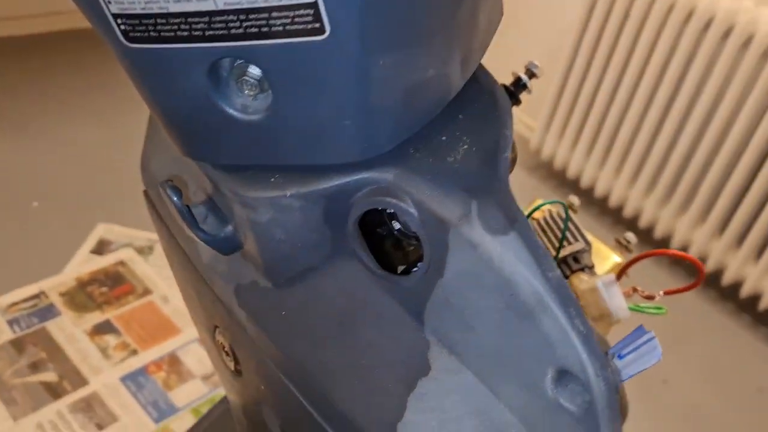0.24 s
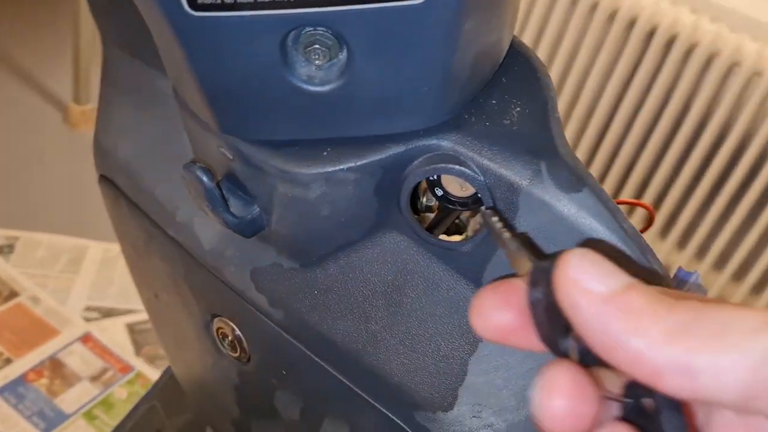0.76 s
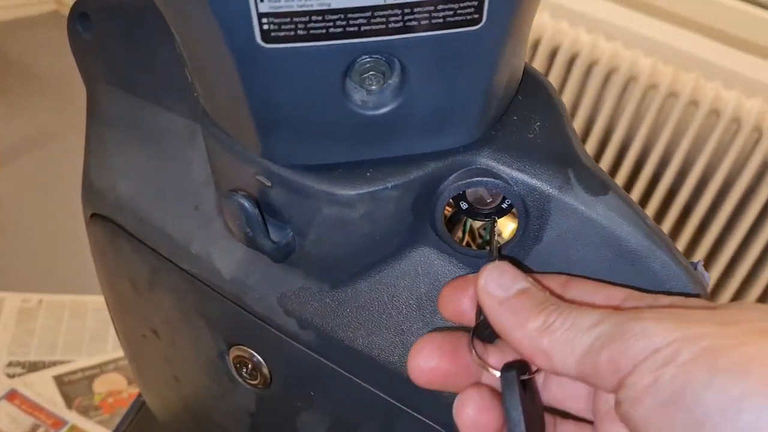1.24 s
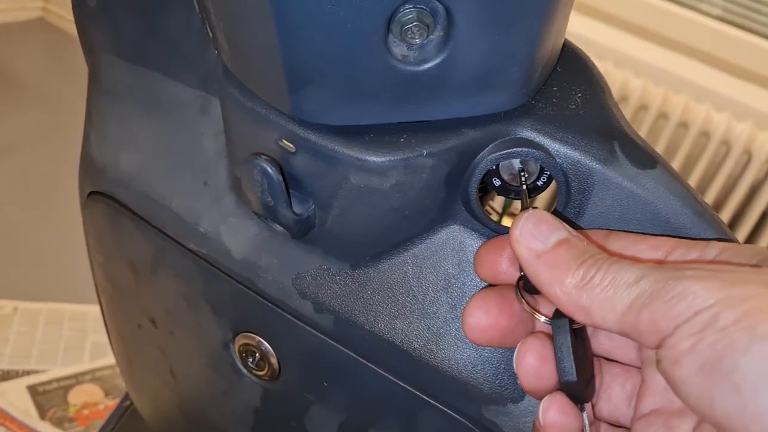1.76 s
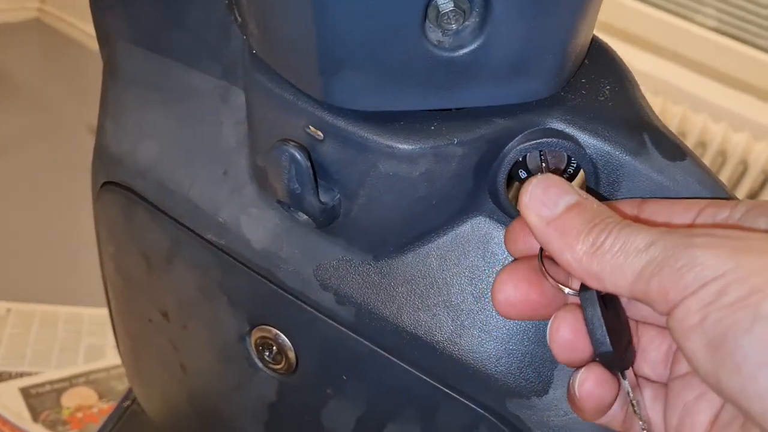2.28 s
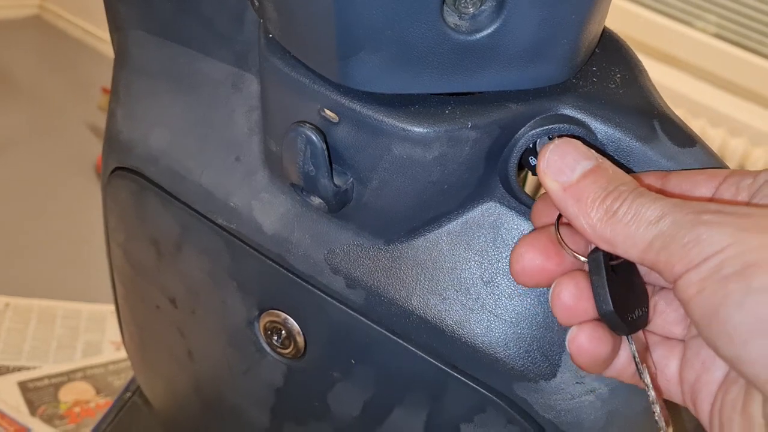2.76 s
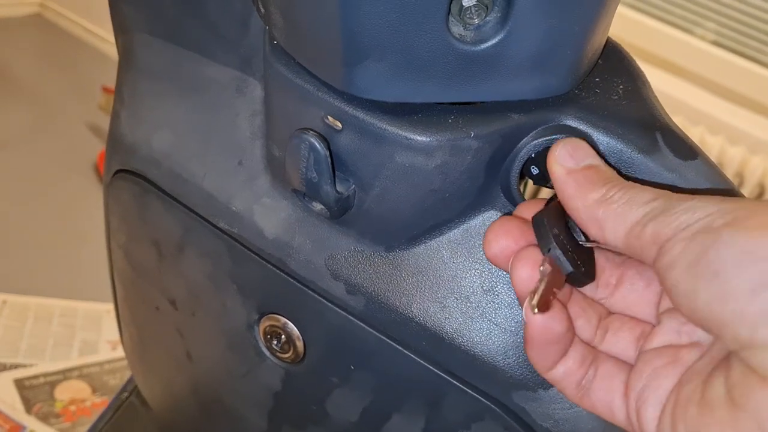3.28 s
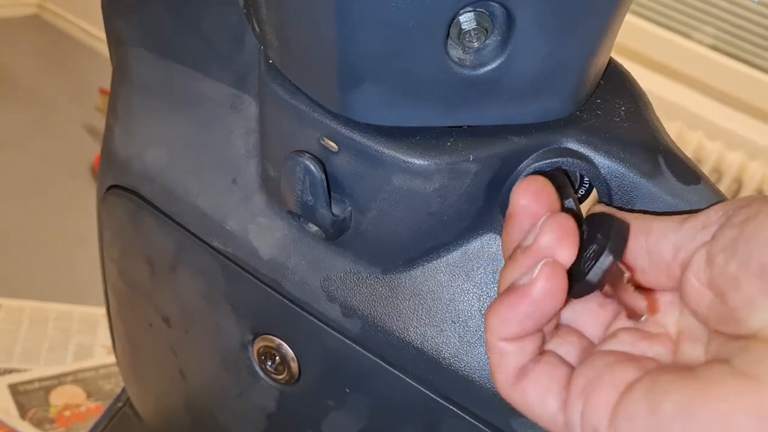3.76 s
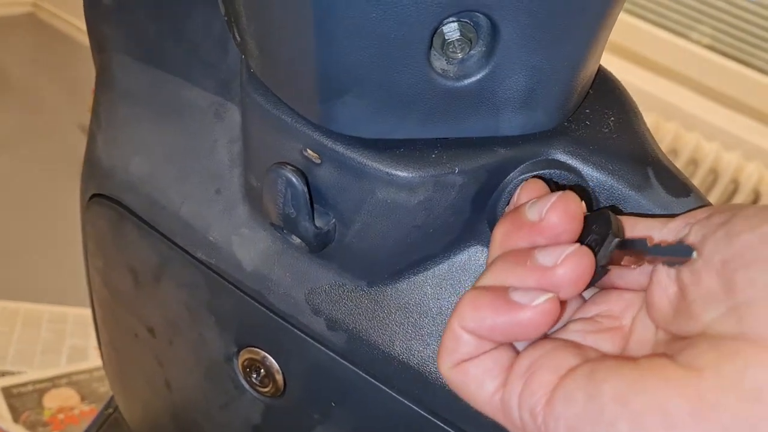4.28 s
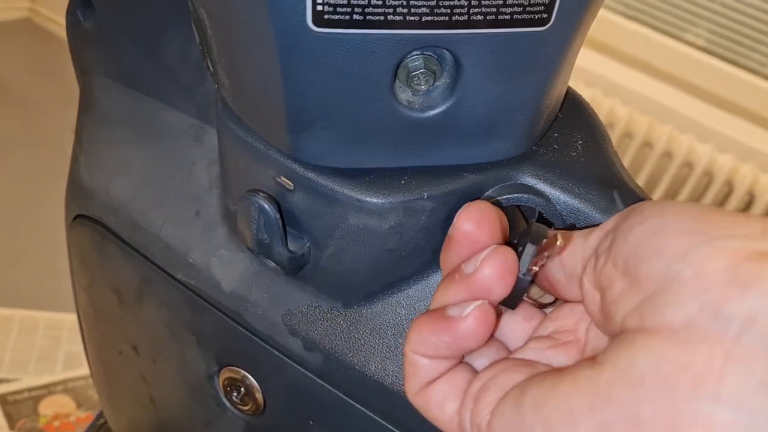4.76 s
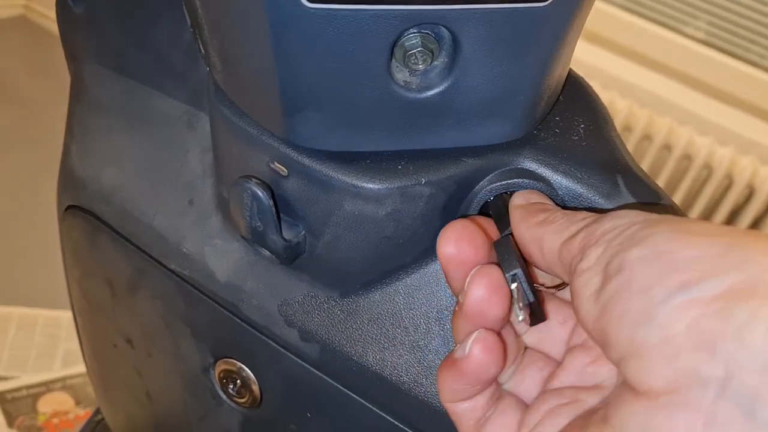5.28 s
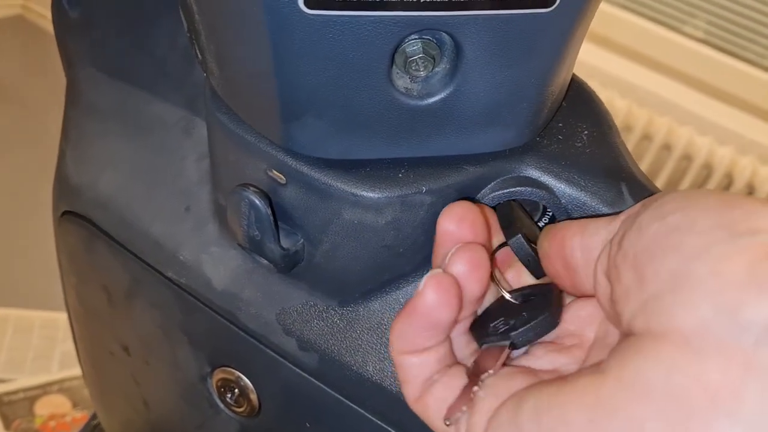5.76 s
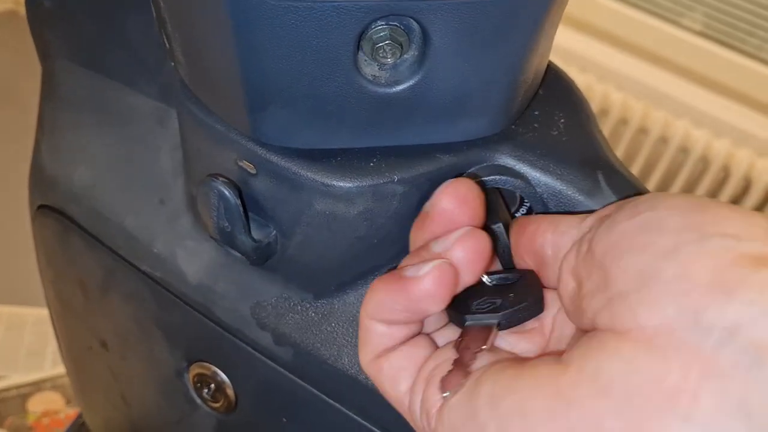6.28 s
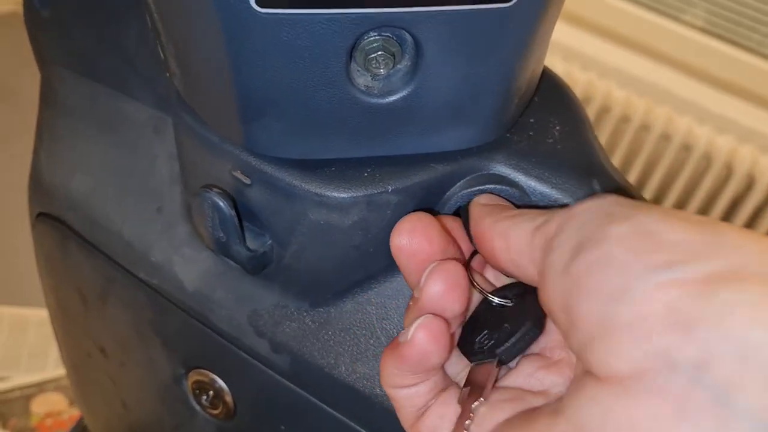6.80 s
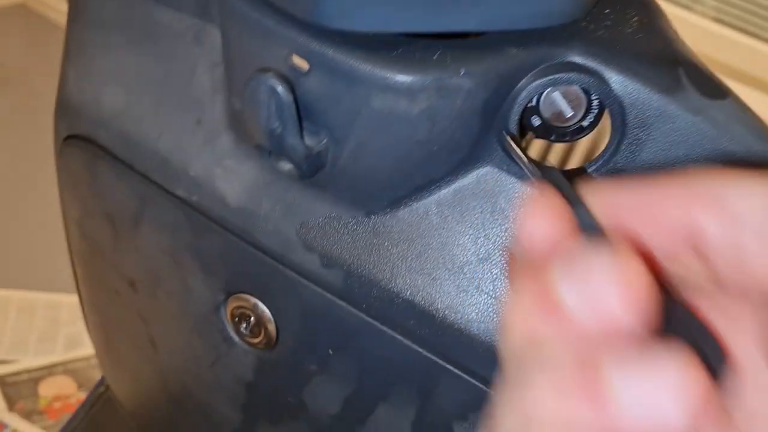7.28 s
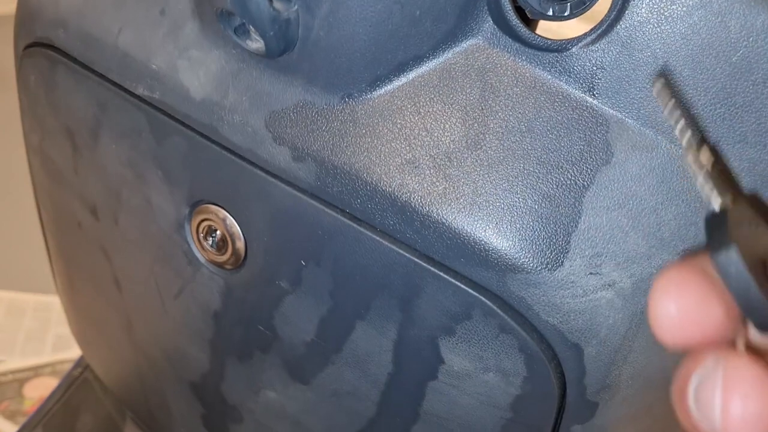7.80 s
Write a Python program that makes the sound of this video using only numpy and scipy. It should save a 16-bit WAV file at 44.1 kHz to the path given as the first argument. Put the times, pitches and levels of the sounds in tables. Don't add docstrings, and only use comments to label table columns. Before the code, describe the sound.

Close handheld stereo of a key worked in a scooter's ignition. Soft cloth and finger rubbing follows a single dull floor tap; light clicks precede a tight cluster of metal pin ticks as the blade slides home, jolting the hollow plastic cowl. Sparse turning clicks and low, muffled knocks follow over quiet room air. A dense burst of snaps, thin metallic singing and plastic clacks marks removal, then rustling settles in the small, reflective room.

```python
import sys
import numpy as np
from scipy import signal
from scipy.io import wavfile
from scipy.ndimage import uniform_filter1d

SR = 44100
rng = np.random.default_rng(int(sys.argv[2]) if len(sys.argv) > 2 else 0)


def invert_db(x):
    u = np.asarray(x, float) / 20
    return 10 ** u


def transcribe(signal):
    frames = np.atleast_2d(signal).T
    limited = np.clip(frames, -1, 1)
    pcm = np.round(limited * 32767).astype(np.int16)
    wavfile.write(sys.argv[1], SR, pcm)


N = 354608

# pitch in Hz, left-right likeness (below 0 counts as 0).
LEFT_RIGHT_LIKENESS = [(50, 0.64), (150, 0.9), (300, 0.85), (600, 0.54), (1500, -0.83), (4000, -0.047),
                       (15000, -1.8)]


def rms_one(x):
    return x / np.sqrt(np.mean(x ** 2) + 1e-20)


def at_hz(points, hz):
    table_hz, value = np.transpose(points)
    return np.interp(np.log(hz), np.log(table_hz), value)


def band(x, low_hz, high_hz):
    sos = signal.butter(2, [low_hz, min(high_hz, .45 * SR)], "band", fs=SR, output="sos")
    return signal.sosfilt(sos, x)


def ring(x, hz, t60):
    r, w = invert_db(-60 / (t60 * SR)), 2 * np.pi * hz / SR
    return signal.lfilter([0, np.sin(w)], [1, -2 * r * np.cos(w), r * r], x + 1e-18)


def drift(rate):
    r = np.exp(-80 * np.pi * rate / SR)
    slow = signal.lfilter([1], [1, -2 * r, r * r], rng.standard_normal(N // 40 + 2002))[2000:]
    return np.interp(np.arange(N) / 40, np.arange(len(slow)), rms_one(slow))


def swells(s, peak_db, rise, fade, hold=0):
    t = np.arange(0, N + 40, 40)[:, None] / SR
    under = np.maximum(np.maximum((s - t) / rise, (t - s - hold) / fade), 0)
    gain = np.sqrt(np.sum(invert_db(peak_db - 10 * under) ** 2, axis=1))
    return np.interp(np.arange(N) / SR, t[:, 0], gain)


def tick(size):
    return 1.0 * (np.arange(size) == 0)


def push(length, size):
    t = np.arange(size) / SR / max(length, 2e-4)
    return np.tile(t * np.exp(-6 * t), (2, 1))


def contact(length, size, shared):
    t = np.arange(size) / SR / max(length, 2e-4)
    both, left, right = rng.standard_normal((3, size))
    shared = np.clip(shared, 0, 1)
    return t * np.exp(-4 * t) * (np.sqrt(shared) * both + np.sqrt(1 - shared) * np.array([left, right]))


def metal(force, hz, part_db):
    part = rms_one(band(force, hz / 1.15, hz * 1.37)) + invert_db(4.0) * rms_one(ring(force, hz, 14 / hz))
    crack = rms_one(band(force, hz / 2.5, hz * 2.23)) + invert_db(-2.5) * rms_one(band(force, 1800, 14000))
    return crack + invert_db(part_db + 4.0) * part


def struck_body(force, modes, centre_hz, focus_db):
    octaves_off = np.log2(np.array(modes)[:, 0] / centre_hz)
    strength_db = 3.5 * rng.standard_normal(len(modes)) - focus_db * octaves_off ** 2
    return sum(invert_db(db + more_db) * ring(force, hz, t60)
               for more_db, (hz, db, t60) in zip(strength_db, modes))


def add(out, near, smooth, s, peak_db, pan_db):
    at = round(s * SR)
    near = near[:, :N - at] * invert_db(peak_db) / np.abs(near.mean(axis=0)).max()
    end = at + near.shape[1]
    out[:2, at:end] += near * invert_db([[pan_db / 2], [-pan_db / 2]])
    out[2, at:end] += rms_one(smooth[:N - at]) * np.sqrt(np.mean(near ** 2))


def clicks():
    # start in seconds, peak in dB,
    # loudest part in Hz, that part over the broad crack in dB, left over right in dB.
    pins_in = [(0.2783, -46, 3600, 6, -3), (1.253, -45.5, 7840, 11, -7), (1.406, -34.5, 3950, -7, 4),
               (1.712, -58.5, 5940, -20, -2.5), (2.2507, -35, 12200, 4, -13), (2.68, -55.5, 6470, 5, -13),
               (2.7883, -29.5, 13900, -6, 1.5), (2.8818, -31, 11800, -5, 38), (3.042, -30.5, 13700, -2, 6),
               (3.049, -31, 8100, -12, 0), (3.071, -34, 12500, -3.5, 3), (3.079, -36.5, 3400, 0, -4),
               (3.1478, -26.5, 15000, 15, 2), (3.1612, -31.5, 11500, 1, 16.5),
               (3.1785, -34.5, 12500, 0, 14), (3.3056, -37.5, 5670, -13, -2), (3.349, -26.5, 3580, -10, -3),
               (3.4785, -27, 6870, 1.5, -3)]
    detents = [(3.7868, -47, 6500, -2, 0), (5.2237, -35.5, 5400, -3.5, 17), (5.4242, -20, 4940, 8, 10),
               (5.69, -57, 6400, 2, -6), (5.71, -37, 11600, 8, 40), (5.7178, -41, 2750, 14, 2),
               (6.107, -35, 4300, -4, -4), (6.401, -62, 7000, 5, 1.5), (6.44, -58, 5100, 13, -1),
               (6.5816, -36, 6840, 4, 3), (6.95, -49, 7840, 13, -5)]
    pins_out = [
        (7.1522, -34.5, 11450, 1, 5.5),
        (7.1812, -25.5, 12300, 5, 5.5),
        (7.227, -18, 12770, 5.5, 9),
        (7.2363, -25, 9960, 1.5, 2),
        (7.241, -28.5, 11900, -6, 2),
        (7.2625, -25, 3190, 7, 2),
    ]
    # (Hz, t60 in seconds).
    loose_key = [
        (1.405, -34.5, [(7700, 0.022), (8300, 0.019), (8700, 0.023)]),
        (2.786, -33, [(12400, .05), (12950, 0.073), (13150, 0.081), (13500, 0.044)]),
        (7.225, -31, [(3400, 0.008), (4050, 0.008), (5800, 0.012)]),
    ]
    out = np.zeros((3, N))
    for table, contact_s in [(pins_in, .0048), (detents, .0015), (pins_out, .0048)]:
        for s, peak_db, hz, part_db, pan_db in table:
            near = metal(contact(contact_s, size=2000, shared=0.21), hz, part_db)
            to_room = metal(tick(size=2000), hz, part_db - 11.0)
            add(out, near, to_room, s - .0012, peak_db - 0.5, 0.5 * pan_db + .8)
    for s, peak_db, modes in loose_key:
        near = sum(ring(contact(0.0003, size=8000, shared=0.26), hz, t60) for hz, t60 in modes)
        add(out, near, near[0], s, peak_db, 2.5)
    return out * invert_db([[0], [0], [-3.0]])


def knocks():
    # start in seconds, panel peak in dB, hollow over panel in dB,
    # panel centre in Hz, hollow centre in Hz.
    jolts = [(0.282, -42, 0.5, 900, 298), (1.41, -39, -5.5, 1630, 339), (2.251, -44, -17, 820, 386),
             (2.793, -32.5, -4, 2140, 335), (2.881, -36, -6.5, 1690, 238), (3.047, -26.5, -3.5, 2220, 311),
             (3.072, -33, -27, 1300, 320), (3.082, -32.5, -22, 1290, 360), (3.176, -29, -3.5, 1070, 231),
             (3.305, -38.5, -6, 870, 234), (3.3488, -26, -9, 1410, 285), (3.48, -26.5, -5, 1520, 243),
             (3.787, -42.5, 9.5, 1080, 296), (5.4252, -27, 2.5, 900, 248), (5.689, -42, -3, 1340, 235),
             (5.717, -33.5, -1.5, 1800, 251), (6.106, -28, 2.5, 1050, 275.6), (6.581, -35.5, 2, 1140, 239),
             (7.153, -45, 10.5, 1850, 232), (7.254, -20.5, -16.5, 1120, 204),
             (7.2599, -19, -6.5, 1250, 276), (7.271, -20, -1, 1230, 241), (7.278, -35, -8, 970, 231)]
    # start in seconds, peak in dB, hollow centre in Hz.
    soft_pushes = [(0.848, -60, 291), (1.988, -53.5, 218), (3.143, -33, 330), (3.204, -31, 363),
                   (3.248, -35, 350), (3.744, -40, 258), (3.803, -34, 260), (3.838, -42.5, 310),
                   (3.913, -59, 293), (4.485, -40.5, 248), (4.505, -32.5, 229), (4.803, -50.5, 245),
                   (4.862, -44, 254), (5.177, -33.5, 258), (5.222, -39, 266), (5.337, -39.5, 253),
                   (5.596, -50.5, 275), (6.344, -32.5, 235), (6.4, -43, 338), (6.914, -49, 247),
                   (7.29, -27, 171.5)]
    # mode in Hz, level in dB, t60 in seconds.
    hollow_modes = [(139, -35.5, 0.17), (171, -38, 0.6), (231, 2.5, 0.17), (259.9, -3.5, 0.3),
                    (293.5, -5, 0.39), (334.7, 1.5, 0.26), (381.7, -5.5, 0.33)]
    panel_modes = [(471, -1.5, 0.01), (555, 8.5, 0.15), (626, 2.5, 0.12), (744, 7.5, 0.066),
                   (889, 6.5, 0.031), (1088, -9, 0.023), (1166, -3, 0.024), (1293, 7, 0.016),
                   (1430, -11, 0.02), (1630, -2, 0.049), (2163, -9, 0.088), (2380, 0, 0.041),
                   (2220, -4, 0.072), (2750, -7, .03)]
    jolt_s, snap_s, push_s = .0028, .00078, .0047
    out = np.zeros((3, N))
    for s, peak_db, hollow_db, panel_hz, hollow_hz in jolts:
        gripped = hollow_modes + [(hollow_hz, 4, .13)]
        hollow = struck_body(push(jolt_s, size=12000), gripped, hollow_hz, focus_db=28.5)
        add(out, hollow, hollow[0], s, peak_db + hollow_db, 1.2)
        force = contact(jolt_s, size=6000, shared=0.81)
        first_touch = rms_one(np.gradient(push(snap_s, size=6000), axis=1))
        snap = rms_one(force) + invert_db(-3.5) * first_touch
        panel = rms_one(struck_body(snap, panel_modes, panel_hz, focus_db=10.0))
        panel += invert_db(-3.0) * rms_one(band(force, panel_hz / 2.4, panel_hz * 1.9))
        to_room = band(tick(size=6000), panel_hz / 5.9, panel_hz * 1.91)
        add(out, panel, to_room, s - .0005, peak_db + 0.5, .4)
    for s, peak_db, hollow_hz in soft_pushes:
        force = contact(4.03 * push_s, size=12000, shared=0.82)
        gripped = hollow_modes + [(hollow_hz, 3, .08)]
        hollow = struck_body(push(push_s, size=12000), gripped, hollow_hz, focus_db=31.0)
        panel = struck_body(force, panel_modes, 720, focus_db=3.5)
        add(out, hollow + invert_db(-19.5) * panel, hollow[0], s - .002, peak_db, 1.2)
    return out


def blade():
    # start in seconds, peak in dB, blade note in Hz.
    touches = [(7.1572, -26, 11030), (7.1682, -33.5, 10970), (7.173, -27, 11200), (7.1837, -37, 11300),
               (7.1923, -36.5, 11240), (7.1994, -39.5, 11270), (7.207, -39, 11060), (7.225, -28.5, 11540),
               (7.246, -44, 11500), (7.263, -44, 11550), (7.2812, -50.5, 11200)]
    out = np.zeros((3, N))
    t = np.arange(4000) / SR
    for s, peak_db, hz in touches:
        swell = (t / .009) ** 2 * np.exp(-5 * t / 0.0071)
        tone = swell * np.sin(2 * np.pi * hz * t + [[0], [1.5]])
        add(out, tone, tone[0], s - .002, peak_db, 5.0)
    return out * invert_db([[0], [0], [-4.0]])


def small_parts():
    # start in seconds, peak in dB,
    # loudest part in Hz, that part over the broad crack in dB.
    teeth = [(7.1498, -43.5, 3160, 6), (7.155, -34.5, 6650, 6), (7.162, -41, 5000, 2),
             (7.1712, -35, 4000, 5), (7.182, -32.5, 6700, 1.5), (7.1925, -33, 5400, 6),
             (7.1935, -32, 14000, 4), (7.2028, -29.5, 5500, 8), (7.204, -30.5, 15200, 6),
             (7.212, -34, 13000, 2), (7.2312, -29, 6000, 1), (7.244, -33.5, 5480, 4),
             (7.2711, -31.5, 4200, 3), (3.84, -52, 7060, 2), (3.087, -40, 7500, 2), (3.168, -37, 9500, 4),
             (5.6895, -51, 6400, 6), (0.914, -53, 5500, 2), (1.165, -60, 8000, -6), (1.357, -44, 3000, 4),
             (2.622, -66, 2480, 2), (5.159, -60, 4600, 4), (5.172, -56, 4800, 6), (6.346, -62, 5200, 4),
             (7.159, -38, 13000, 2), (7.2215, -38, 15000, 2), (1.247, -58, 6000, 0)]
    # start in seconds, peak in dB, note in Hz,
    # t60 in seconds.
    taps = [(7.2605, -18, 1254, 0.022), (7.2625, -19.5, 1150, 0.022), (7.2765, -28.5, 1410, 0.0096),
            (3.777, -43.5, 726, .03), (3.5, -39.5, 1260, 0.019), (5.718, -54, 2632, .12),
            (5.7185, -44, 1100, .02), (2.8822, -26, 7500, .003), (7.26, -13, 2400, .002),
            (3.3555, -32, 1100, .015), (7.272, -24, 2740, .006), (5.4236, -26, 5000, .006),
            (7.181, -28, 9000, .002), (6.1065, -33, 1300, .015), (5.689, -50, 3100, .04),
            (6.346, -61, 1300, .03), (6.377, -50, 1190, 0.036), (6.403, -58, 1000, .03),
            (6.438, -58, 1150, 0.027), (1.1, -49, 390, 0.022), (0.93, -54, 400, 0.022)]
    # start in seconds, length in seconds, level in dB,
    # low edge in Hz, high edge in Hz.
    slides = [(0.0, 0.038, -46, 1500, 6900), (0.659, .06, -55.5, 910, 1800), (1.274, 0.062, -59, 553, 1050),
              (3.05, 0.061, -49, 1010, 3600), (3.775, 0.013, -63, 2980, 8000), (2.68, .05, -62, 1000, 8500),
              (5.172, .045, -66, 3800, 5400), (5.16, .055, -63, 500, 1400), (3.774, .07, -61, 500, 2300),
              (5.69, .04, -55, 600, 3500), (3.351, .05, -54, 2400, 4000), (7.226, .022, -50, 5000, 6600),
              (7.153, 0.077, -52, 3600, 15500), (7.222, .024, -43, 2980, 15500)]
    rise_s, fade_s = .003, .037
    out = np.zeros((3, N))
    for s, peak_db, hz, part_db in teeth:
        crack = metal(contact(.003, size=2000, shared=.3), hz, part_db)
        add(out, crack, crack[0], s - .0006, peak_db, 2.5)
    for s, peak_db, hz, t60 in taps:
        note = ring(push(.0003, size=12000), hz, t60)
        add(out, note, note[0], s, peak_db, .8)
    grit = invert_db(3.5 * drift(200))
    t = np.arange(8000) / SR
    for s, length, db, low_hz, high_hz in slides:
        at = round(s * SR)
        under = np.maximum(np.maximum((rise_s - t) * 3 / rise_s, (t - length) / fade_s), 0)
        hiss = rms_one(band(rng.standard_normal((2, 8000)), low_hz, high_hz))
        out[:2, at:at + 8000] += invert_db(db - 10 * under) * grit[at:at + 8000] * hiss
    return out * invert_db([[0], [0], [-4.0]])


def step():
    # start in seconds, peak in dB.
    footfalls = [
        (0.135, -20),
    ]
    # mode in Hz, level in dB, t60 in seconds.
    floor_modes = [(410, -35, 0.027), (615, 6, 0.025), (780, 23, 0.0069), (970, -5, .01)]
    out = np.zeros((3, N))
    for s, peak_db in footfalls:
        near = sum(invert_db(db) * ring(push(0.00013, size=4000), hz, t60) for hz, db, t60 in floor_modes)
        add(out, near, near[0], s + 0.00214, peak_db, -1.5)
    return out * invert_db([[0], [0], [3.0]])


def banded_noise(spectrum, patchy_db, rate):
    out, together = 0, drift(rate)
    lowest_hz, highest_hz = spectrum[0][0], spectrum[-1][0]
    edges = lowest_hz * 2 ** np.arange(0, np.log2(highest_hz / lowest_hz) + .2, 1 / 3)
    white = rng.standard_normal((2, 2, N))
    for k, (low, high) in enumerate(zip(edges, edges[1:])):
        mid, side = band(white[k % 2], low, high)
        hz = np.sqrt(low * high)
        alike = np.clip(at_hz(LEFT_RIGHT_LIKENESS, hz), 0, 1)
        stereo = np.sqrt(1 + alike) * mid + np.sqrt(1 - alike) * side * [[1], [-1]]
        out = out + invert_db(at_hz(spectrum, hz)) * stereo
    return rms_one(out * invert_db(patchy_db * together))


def scrapes(bright, dull):
    # start in seconds, length in seconds,
    # bright level in dB, dull over bright in dB.
    slides = [(0.0, 0.023, -54, 0.5), (0.6, 0.025, -60, -16), (0.69, 0.014, -51.5, -5),
              (1.258, .025, -66.5, -3), (1.28, 0.08, -55, -2), (1.402, 0.0019, -53, -11),
              (3.043, 0.069, -58.5, 1), (5.158, 0.055, -72, 8), (2.679, 0.034, -74, 8),
              (5.689, 0.032, -59.5, 8), (6.374, 0.079, -73.5, 5.5), (7.158, 0.03, -55, 0)]
    s, length, db, dull_db = np.transpose(slides)
    shape = 0.0024, 0.039, length
    slips_per_s, slip_s = 210, 0.0027
    slips = (rng.random(N) < slips_per_s / SR) * rng.exponential(1, N)
    slipping = signal.lfilter([1], [1, -np.exp(-1 / (slip_s * SR))], slips + 1e-18)
    grit = invert_db(2.0 * drift(150)) * (1 + invert_db(-5) * slipping)
    return rms_one(grit) * (swells(s, db, *shape) * bright + swells(s, db + dull_db, *shape) * dull)


def handling():
    # top in seconds, rub in dB, fade in seconds per 10 dB,
    # weight on the cowl in dB.
    moves = [(0.018, -51, 0.1732, 1.5), (0.335, -53.5, 0.3141, -3.5), (0.47, -63, 0.34, -5.5),
             (0.615, -52, 0.15, -5), (0.72, -55, 0.19, -1.5), (0.91, -55.5, 0.19, -3.5),
             (1.03, -58, 0.2, -2.5), (1.13, -65, 0.19, -8), (1.45, -64, 0.0745, 4.5), (2.05, -90, 0.4, 17),
             (1.62, -76, 0.1, 3), (1.8, -76, 0.1, 3), (2.16, -77, 0.1, 0), (2.45, -77, .08, 0),
             (2.35, -70.5, -0.05, -9), (2.74, -78, 0.06, -4), (2.85, -74, 0.04, 14), (3.092, -56, 0.06, 2),
             (3.219, -61, -0.0024, 16), (3.42, -57.5, 0.19, 1.5), (3.58, -67.5, 0.23, 2.5),
             (3.839, -65.5, 0.2, 0), (4.06, -77, 0.2, -6), (4.24, -80, 0.1, 0), (4.508, -73, 0.11, 8.5),
             (4.7, -82, .03, 0), (4.84, -70, 0.16, -3), (5.209, -77, 0.0845, 21), (5.49, -66, 0.08, 9),
             (5.692, -68.5, 0.18, 10.5), (5.35, -75, .06, 0), (5.95, -76.5, .4, -7), (6.7, -78, .08, 0),
             (6.41, -74, 0.2, 11), (6.943, -61.5, 0.02, 2.5), (7.21, -63, 0.18, 1.5),
             (7.37, -54.5, 0.17, 3), (7.548, -63.5, 0.3, -20), (7.85, -75, .3, -10), (8.02, -72, .06, -8)]
    # top in seconds, level in dB,
    # fade in seconds per 10 dB.
    sway = [(0.1, -71.5, 1.3), (0.8, -71, 0.15), (1.4, -72, 0.2), (3.2, -64.5, 0.42), (3.5, -68, 0.24),
            (3.851, -71.5, 0.3), (4.52, -66, .12), (2.85, -69.5, 0.1), (4.9, -71, .1), (5.25, -72, 0.3),
            (6.09, -70.5, .5), (7.2, -56.5, 0.18), (7.32, -61.5, 0.12)]
    # pitch in Hz, level in dB per Hz.
    rub_colour = [(1180, -5), (2000, 9), (6030, 0.5), (8970, -1.5), (12100, -9), (15100, 9), (16100, -11),
                  (16500, -41.5)]
    hum_colour = [(240, -29.5), (400, 4.5), (615, -3.5), (663, 2), (1380, -2.5), (3000, -16), (3900, -33.5),
                  (4700, -60)]
    rumble_colour = [(59, -42), (100, -27.5), (145, 1), (184, -17.5), (281, 1), (486, -14), (780, -36),
                     (1320, -120)]
    sway_colour = [(25, -38), (40, -0.5), (55, 4.5), (80, -1.5), (110, -1), (140, -1.5)]
    rise_share, weave_hz = 0.57, 8880
    bright = banded_noise(rub_colour, patchy_db=.8, rate=30)
    dull = banded_noise(hum_colour, patchy_db=.8, rate=30)
    s, db, fade, weight_db = np.transpose(moves)
    rise = rise_share * fade
    cloth = invert_db(-4) * bright + invert_db(-2.5) * band(bright, weave_hz / 2.33, weave_hz * 1.9)
    out = swells(s, db, rise, fade) * cloth
    out += swells(s, db + weight_db - 3, rise, fade) * dull
    out += scrapes(bright, dull)
    rumble_gain = swells(s, db + 1.37 * weight_db - 4.5, rise, 1.27 * fade)
    out += rumble_gain * banded_noise(rumble_colour, patchy_db=-2.0, rate=5.1)
    s, db, fade = np.transpose(sway)
    sway_gain = swells(s, db, rise_share * fade, fade)
    return out + sway_gain * banded_noise(sway_colour, patchy_db=0.9, rate=4.03)


def room(x):
    # pitch in Hz, t60 in seconds.
    decay = [(100, 0.69), (400, 0.41), (1500, 0.43), (5000, 0.38), (15000, 0.29)]
    # pitch in Hz, gain in dB.
    loudness = [(100, -9.5), (400, 9.5), (1500, 8.5), (5000, 8), (15000, 5)]
    t = np.arange(SR) / SR
    onset = np.clip((t - .002) / 0.0018, 0, 1)
    white = rng.standard_normal((2, SR))
    echoes = np.zeros((2, SR))
    for hz in 90 * 2 ** np.arange(0, 8, .5):
        alike = np.clip(at_hz(LEFT_RIGHT_LIKENESS, hz), 0, 1)
        mid, side = band(white, hz / 2 ** .25, hz * 2 ** .25)
        t60 = at_hz(decay, hz)
        even_energy = np.sqrt(np.log(1e6) / t60 / SR / 2)
        fade = invert_db(at_hz(loudness, hz) - 60 * t / t60) * even_energy
        echoes += fade * (np.sqrt(1 + alike) * mid + np.sqrt(1 - alike) * side * [[1], [-1]])
    return signal.fftconvolve(x.mean(axis=0)[None], echoes * onset, axes=1)[:, :N]


def room_tone():
    # pitch in Hz, level in dB per Hz.
    air_colour = [(15, -42), (40, -9), (304, 0.5), (617, -12), (2600, -39.5), (7500, -29), (15200, -25),
                  (16500, -43)]
    # pipe note in Hz, t60 in seconds, level in dB.
    pipe_notes = [(1657, 0.018, -83), (1800, 0.014, -90.5), (7650, 0.0036, -81.5)]
    tone = invert_db(-71.5) * banded_noise(air_colour, patchy_db=.7, rate=3)
    for hz, t60, db in pipe_notes:
        water = rms_one(ring(rng.standard_normal((2, N)), hz, t60))
        tone += invert_db(db + 1.5 * drift(2.7)) * water
    return tone


def scene():
    struck = clicks() + knocks() + blade() + step() + small_parts()
    no_bass = signal.butter(3, 246, "high", fs=SR, output="sos")
    struck = signal.sosfilt(no_bass, struck)
    return struck[:2] + room(struck[2:]) + handling() + room_tone()


def gate(x):
    gate_hz, quiet_share, window_s = 12400, .045, .05
    low = signal.sosfiltfilt(signal.cheby2(10, 40, gate_hz, fs=SR, output="sos"), x)
    level = uniform_filter1d(band(x.mean(axis=0), 9000, 11800) ** 2, round(window_s * SR))
    is_open = 1.0 * (level > np.quantile(level, quiet_share))
    return low + (x - low) * uniform_filter1d(is_open, 300)


def top_cut(x):
    return signal.sosfilt(signal.butter(12, 16820, fs=SR, output="sos"), x)


def record(dry):
    cut = signal.sosfiltfilt(signal.cheby2(16, 25, 16100, fs=SR, output="sos"), dry)
    leak = invert_db(-28) * (dry - cut)
    return top_cut(gate(cut + leak))


dry = scene()
out = record(dry)
transcribe(out)
```